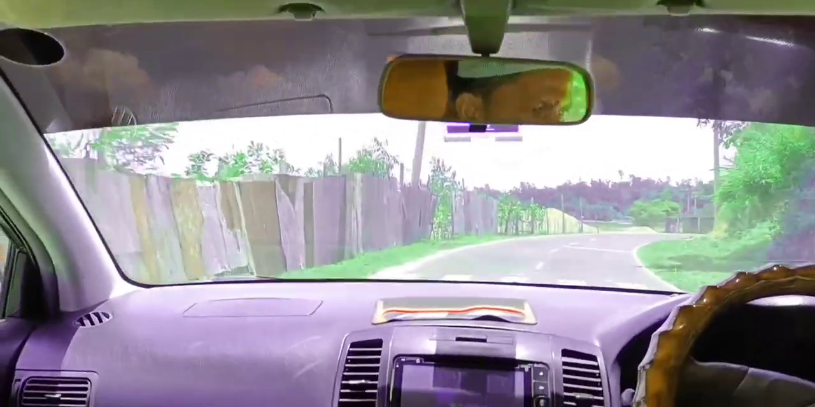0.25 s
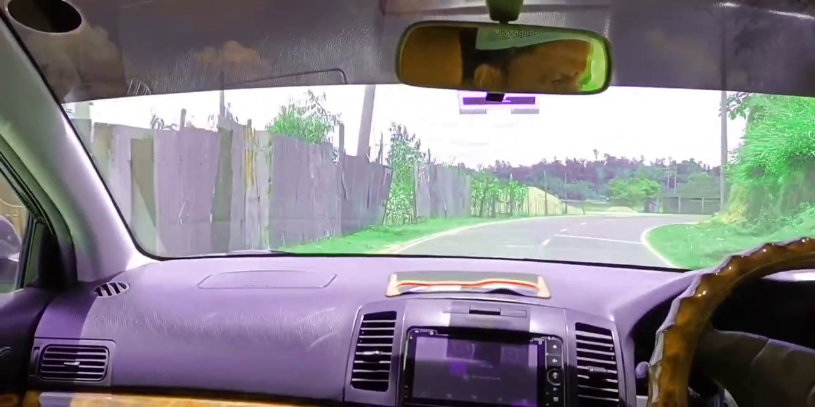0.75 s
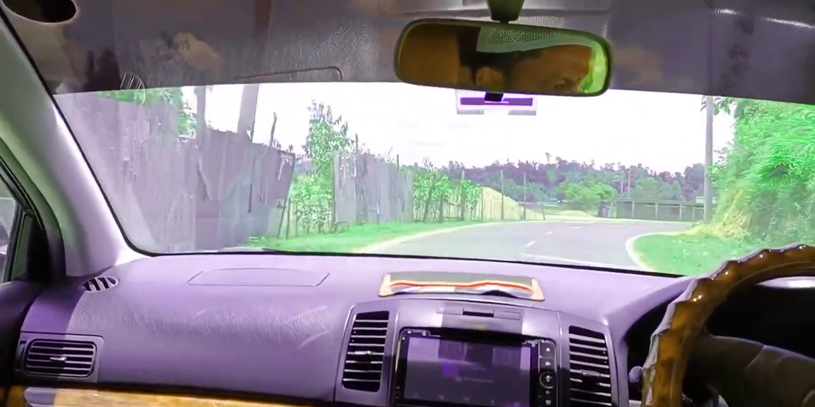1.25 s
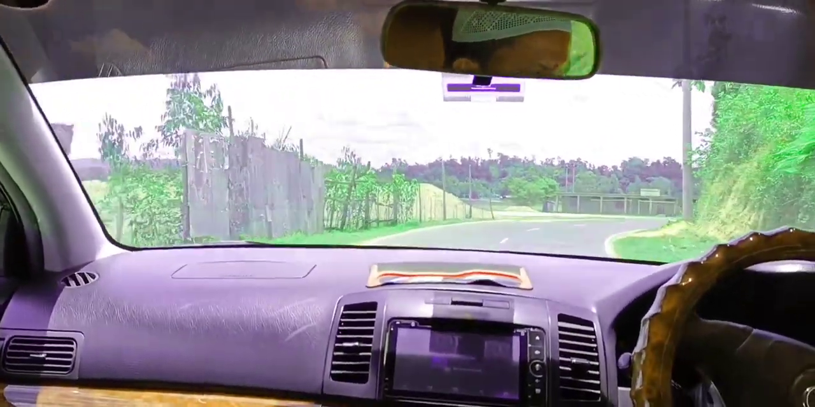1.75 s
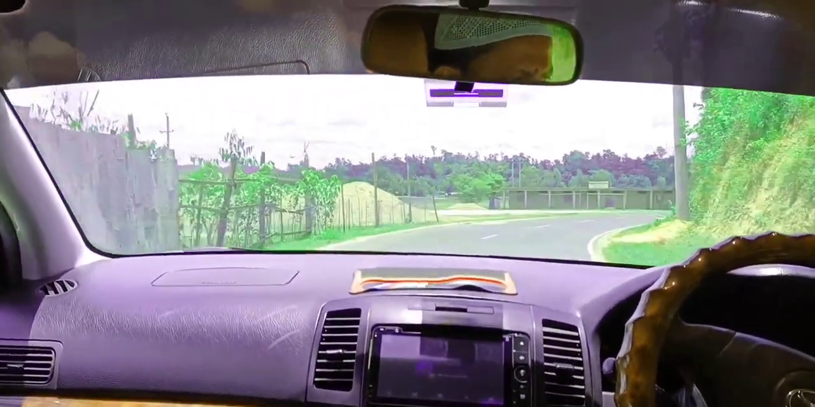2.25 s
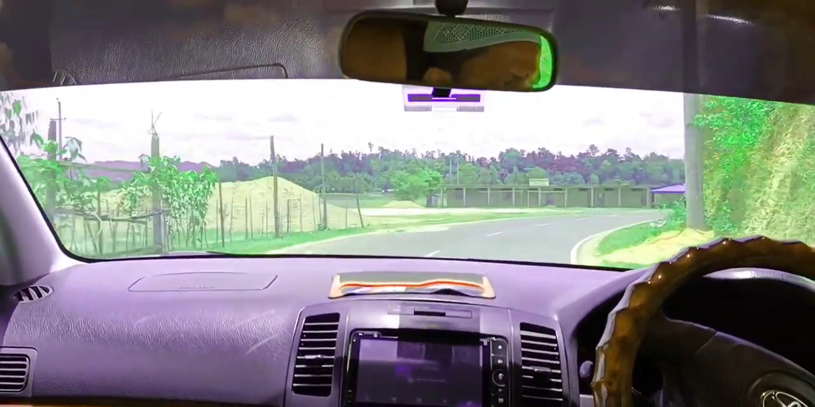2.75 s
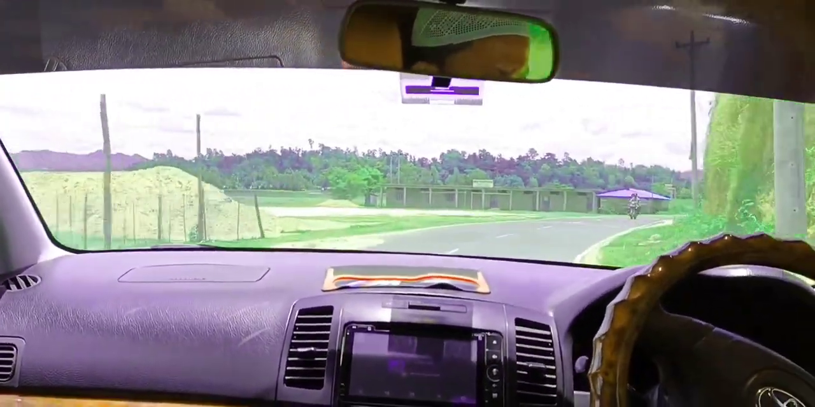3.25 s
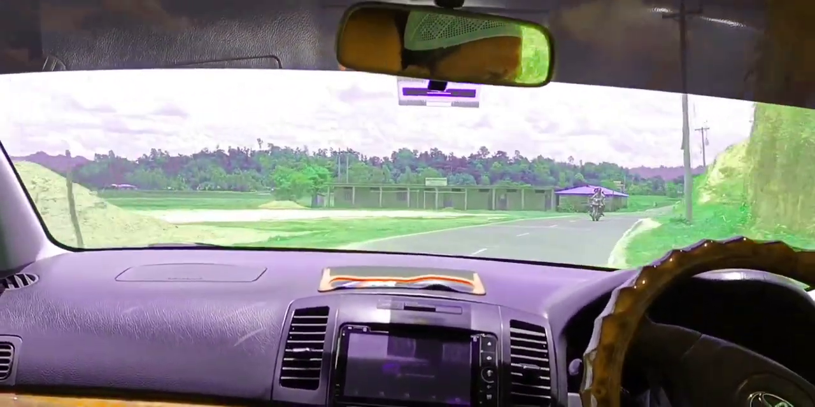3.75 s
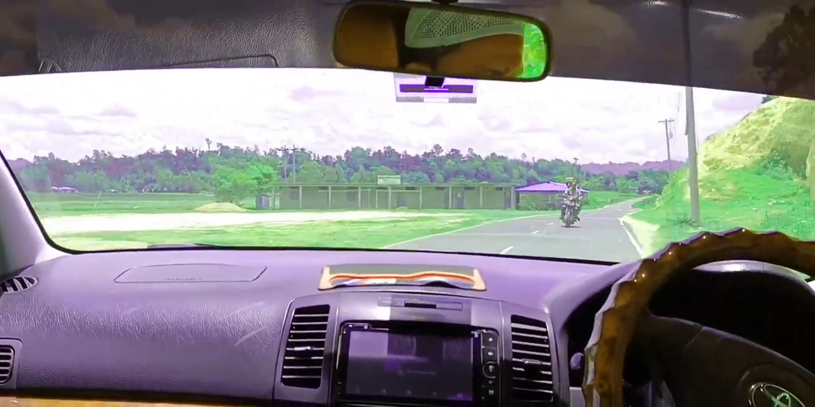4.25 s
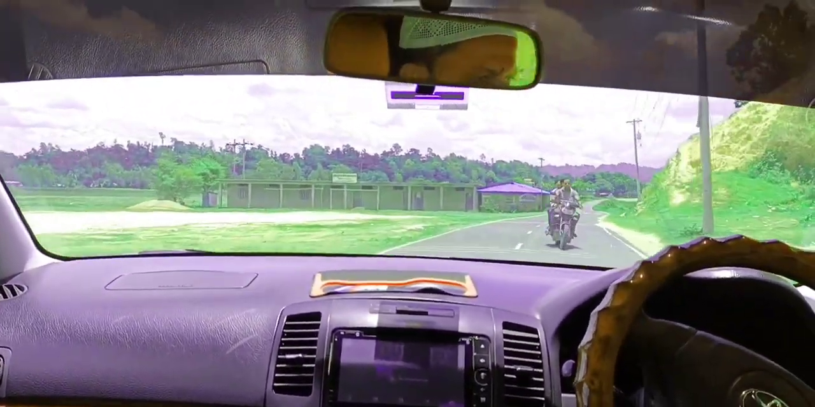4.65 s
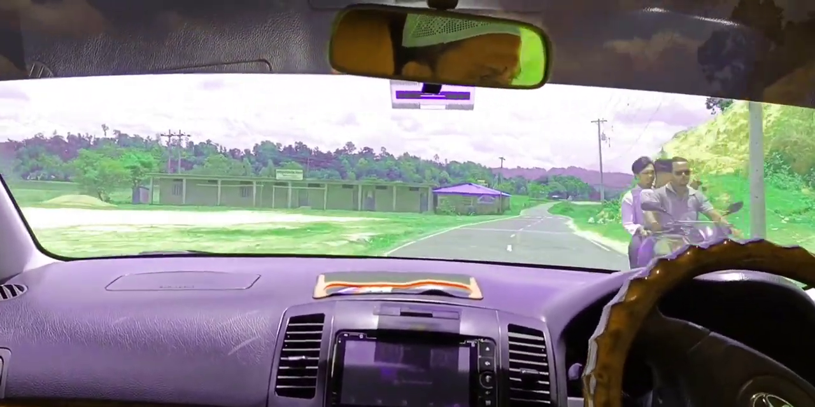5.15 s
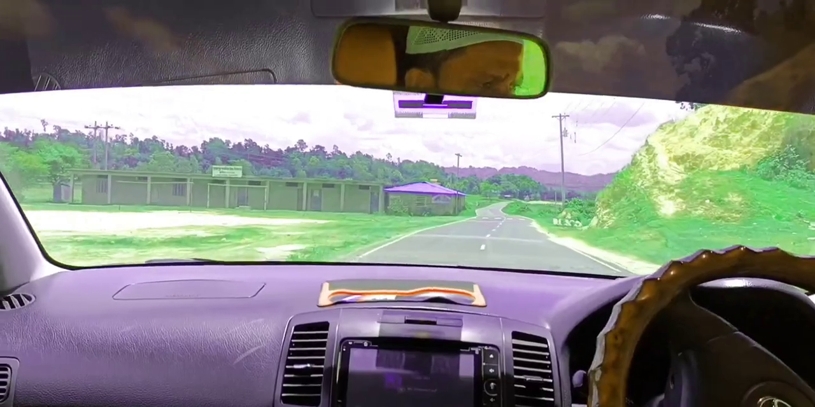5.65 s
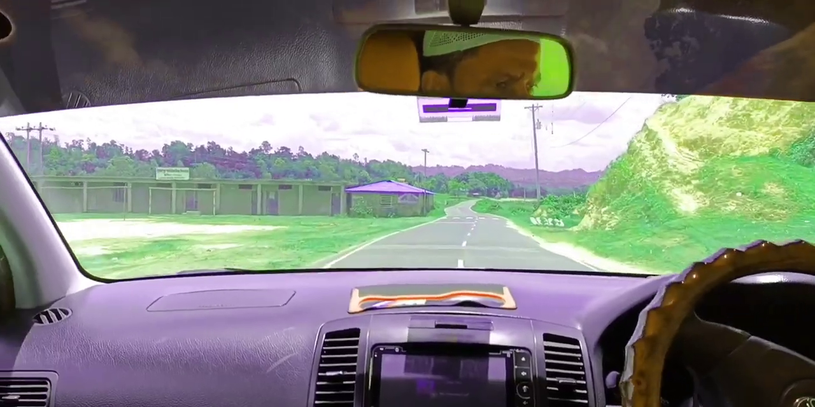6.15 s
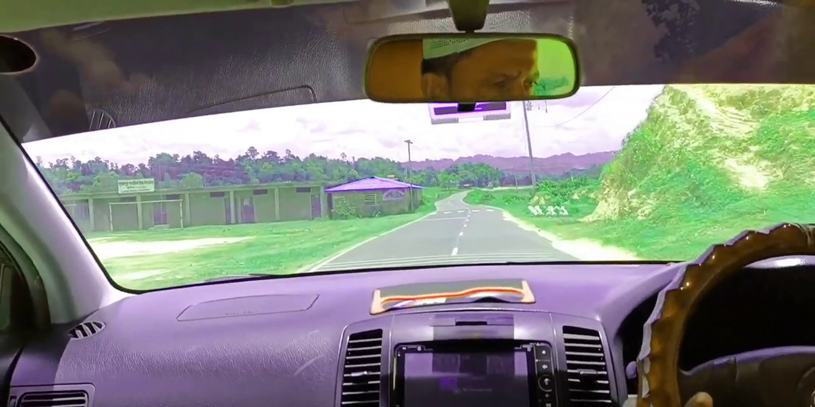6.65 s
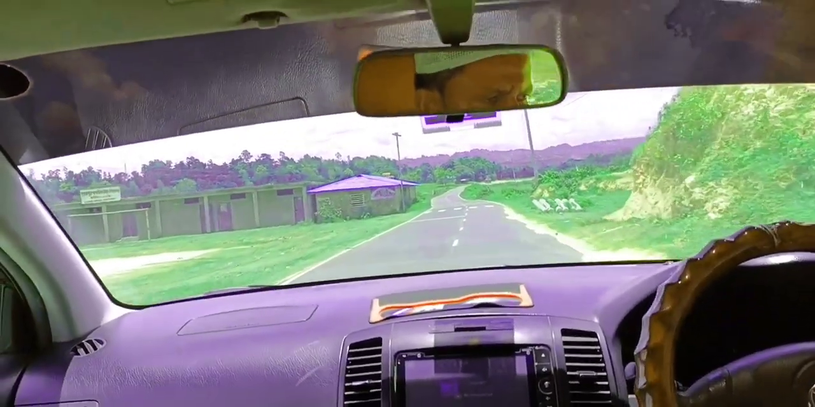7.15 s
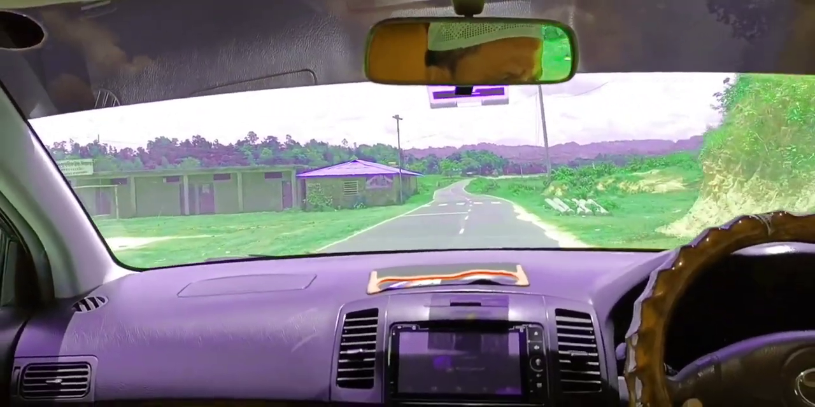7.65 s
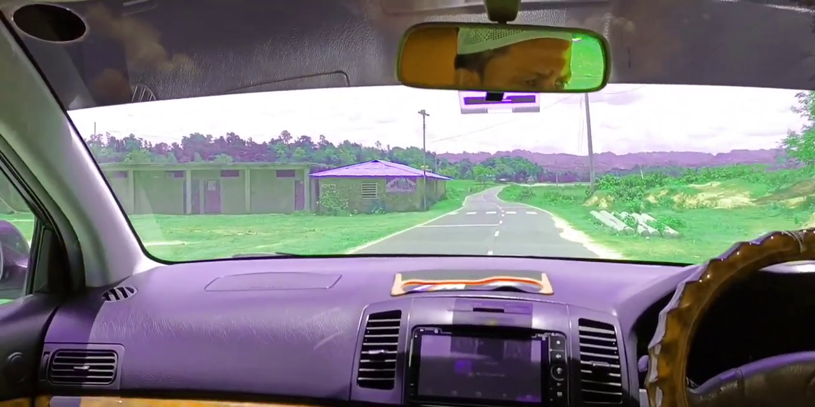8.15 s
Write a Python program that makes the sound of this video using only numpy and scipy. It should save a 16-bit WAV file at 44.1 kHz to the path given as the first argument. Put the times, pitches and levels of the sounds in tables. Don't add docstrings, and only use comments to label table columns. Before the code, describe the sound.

Low cabin boom and tyre drone, scattered clicks and squeaks, a motorbike's faint swish, then two quick axle thumps with rattling trim.

```python
import sys
import numpy as np
from scipy import signal
from scipy.io import wavfile
from scipy.ndimage import uniform_filter1d, minimum_filter1d

SR = 44100
rng = np.random.default_rng(int(sys.argv[2]) if len(sys.argv) > 2 else 0)


def master(y):
    cut = np.clip(np.atleast_2d(y).T, -1, 1)
    pcm = np.round(cut * 32767)
    wavfile.write(sys.argv[1], SR, pcm.astype(np.int16))


def rack_gain(trim_db):
    fader = np.asarray(trim_db, float)
    return 10 ** (fader / 20)


N = 369999


def mid_rms_one(x):
    return x / np.sqrt(np.mean(np.mean(x, axis=0) ** 2) + 1e-20)


def in_time(rows):
    s, *columns = np.transpose(rows)
    return [np.interp(np.arange(N) / SR, s, column) for column in columns]


def at_hz(points, hz):
    table_hz, value = np.transpose(points)
    return np.interp(np.log(hz), np.log(table_hz), value)


def drift(rate_hz, n=N):
    r = np.exp(-80 * np.pi * rate_hz / SR)
    slow = signal.lfilter([1], [1, -2 * r, r * r], rng.standard_normal(n // 40 + 2002))[2000:]
    return np.interp(np.arange(n) / 40, np.arange(len(slow)), slow / slow.std())


# f/Hz, likeness (0 to 1)
LIKENESS_BY_PITCH = [(40, 1), (130, .89), (340, 0.91), (500, 0.44), (700, 0.55), (1100, 0.019),
                     (16000, .02)]


def spread(pair, hz):
    alike = at_hz(LIKENESS_BY_PITCH, hz)
    mid, side = np.sqrt(1 + alike) * pair[0], np.sqrt(1 - alike) * pair[1]
    return np.array([mid + side, mid - side])


# left delay/ms, right delay/ms, level/dB
CABIN_ECHOES = [(1.37, 1.693, -27.5), (2.93, 2.325, -18), (4.79, 5.53, -33), (7.91, 6.2, -18),
                (12.7, 11.3, -15)]
# f/Hz, width/Hz, level/dB
RIGHT_PORT_PEAKS = [(2071, 550, 15.5), (1260, 1800, 3.5), (3860, 800, 6.5), (4670, 720, -5),
                    (6290, 1730, 16), (7940, 2340, -15.5), (12400, 1400, 5.5), (14280, 1330, 13)]


def ports(x):
    heard, sections = x.copy(), []
    for k, (left_ms, right_ms, db) in enumerate(CABIN_ECHOES):
        for side, delay_ms in enumerate([left_ms, right_ms]):
            lag = round(delay_ms * SR / 1000)
            heard[side, lag:] += (-1) ** k * rack_gain(db) * x[side, :-lag]
    for hz, width_hz, db in RIGHT_PORT_PEAKS:
        a, k = rack_gain(db / 2), np.tan(np.pi * width_hz / SR)
        turn = -2 * np.cos(2 * np.pi * hz / SR)
        section = np.array([1 + k * a, turn, 1 - k * a, 1 + k / a, turn, 1 - k / a])
        sections.append(section / (1 + k / a))
    return np.array([heard[0], signal.sosfilt(sections, heard[1])])


def grainy(per_s, size_db, share, n=N):
    snaps = (rng.random(n) < per_s / SR) * rack_gain(size_db * np.minimum(rng.exponential(1, n), 2.5))
    bursts = signal.lfilter([1], [1, -.985], snaps)
    return rng.standard_normal((2, 2, n)) * (1 + share * bursts)


def banded(spectrum, source, patchy_db):
    out = 0
    edges = 2 ** np.arange(np.log2(spectrum[0][0]), np.log2(spectrum[-1][0]) + .2, 1 / 3)
    for k, (lo, hi) in enumerate(zip(edges, edges[1:])):
        sos = signal.butter(2, [lo, hi], "band", fs=SR, output="sos")
        pair = signal.sosfilt(sos, source[k % 2])
        hz = np.sqrt(lo * hi)
        level_db = at_hz(spectrum, hz) + patchy_db * drift(9.1, n=source.shape[-1])
        out = out + rack_gain(level_db) * spread(pair, hz)
    return mid_rms_one(ports(out))


def modal_noise(modes, evenness):
    out = 0
    for hz, width_hz, db in modes:
        r = np.exp(-np.pi * width_hz * 1.5 / SR)
        section = [1 - r, 0, r - 1, 1, -2 * r * np.cos(2 * np.pi * hz / SR), r * r]
        pair = signal.sosfilt([section, section], rng.standard_normal((2, N + 8000)))[:, 8000:]
        out = out + rack_gain(db + 2.5 * np.tanh(drift(3.37))) * spread(pair / pair.std(), hz)
    swell = uniform_filter1d(uniform_filter1d(out.mean(axis=0) ** 2, size=1500), size=1500)
    return mid_rms_one(out / (swell + 0.027 * swell.mean()) ** (evenness / 2))


# frequency multiple, level/dB
UPPER_PARTIALS = [(2.16, -16.5), (2.5, -25), (3.53, -23)]


def hum(rows, upper_db):
    coast_s, coast_db_per_s = 4.656, 21
    hz, db = in_time(rows)
    s = np.arange(N) / SR
    on = np.clip(np.minimum(s - rows[0][0] + 0.084, rows[-1][0] - s) / 0.098, 0, 1)
    phase = 2 * np.pi * np.cumsum(hz + 1.3 * drift(2.93)) / SR
    upper = sum(rack_gain(level_db + 3.3 * drift(10.6)) * np.sin(k * phase) for k, level_db in UPPER_PARTIALS)
    load_db = upper_db - coast_db_per_s * np.maximum(s - coast_s, 0)
    return np.sqrt(2) * on * (rack_gain(db + 2.0 * drift(3.15)) * np.sin(phase) + rack_gain(load_db) * upper)


def bursts(events):
    out, t = np.zeros((2, N + SR)), np.arange(SR // 3) / SR
    noise = rng.standard_normal((len(events), 2, len(t)))
    grains = rng.standard_normal((len(events), 1, len(t) // 60))
    noise *= rack_gain(2.7 * np.repeat(grains, 60, axis=2))
    noise[:, 0, 8] += 45 * np.exp(-np.array(events)[:, 4] / 0.0018)
    for (s, db, hz, t60, held, octaves), pair in zip(events, noise):
        band = np.clip(hz * 2 ** (np.array([-.5, .5]) * octaves), 50, .45 * SR)
        sos = signal.butter(3, band, "band", fs=SR, output="sos")
        rise = np.minimum(t / (held / 6 + 1e-4), 1)
        decay = rack_gain(-60 * np.maximum(t - held, 0) / t60)
        burst = ports(signal.sosfilt(sos, spread(pair, hz) * rise * decay))
        at = round(s * SR)
        out[:, at:at + len(t)] += rack_gain(db) * burst / np.abs(burst.mean(axis=0)).max()
    return out[:, :N]


# t/s, long-wave level/dB, surface-texture level/dB
ROAD_PROFILE = [(0, -19, -25), (.15, -18.5, -20.5), (.45, -19, -26.5), (.7, -21.5, -23.5), (1.3, -21, -22),
                (1.75, -18, -22), (2.5, -21.5, -22), (3.25, -18, -21), (3.55, -21.5, -22.5),
                (4.3, -24, -22.5), (4.5, -21, -20.5), (5.4, -24, -23.5), (6.0, -21.5, -21),
                (6.4, -18, -25.5), (6.85, -21.5, -22.5), (7.6, -23.5, -26.5), (7.85, -14, -21),
                (8.39, -18, -24)]


def road():
    waves_db, texture_db = in_time(ROAD_PROFILE)
    return waves_db, texture_db, texture_db - texture_db.mean()


BUMP_START_S, BUMP_END_S = 6.8, 7.6
# t/s, level/dB, held/s, t60/s
AXLE_JOLTS = [
    (6.922, -18, 0.022, 0.13),
    (6.97, -23.5, 0.031, 0.26),
    (7.02, -31.5, .03, 1),
    (7.17, -36, .03, .3),
    (7.222, -25, .04, 0.36),
    (7.254, -23, 0.046, 0.26),
    (7.33, -29, 0.02, 0.2),
    (7.436, -40, 0.017, 0.12),
]


def jolted(gain_db, attack_s, added_t60_s, lead_s=0):
    s, db, held, t60 = np.transpose(AXLE_JOLTS)[:, :, None]
    first = round(BUMP_START_S * SR)
    t = np.arange(first, N) / SR - s + lead_s
    decay_db = 60 * np.maximum(t - held, 0) / (t60 + added_t60_s)
    shape = np.clip(t / attack_s, 0, 1) ** 2 * rack_gain(gain_db + db - decay_db)
    return np.pad(np.sqrt(np.sum(shape ** 2, axis=0)), (first, 0))


# t/s, level/dB
DRAUGHT_LEVEL = [(0, -63.5), (1.9, -66.5), (5.4, -66.5), (6, -63), (6.5, -66), (7.1, -56.5), (7.45, -68.5),
                 (8, -64.5), (8.39, -63.5)]
# f/Hz, level/dB per Hz
SEAL_SPECTRUM = [(4000, -10), (6000, -0.5), (8500, -2), (10000, 3.5), (12000, -8.5), (14000, -2),
                 (16000, -36)]


def seal_draught():
    level_db, = in_time(DRAUGHT_LEVEL)
    return rack_gain(level_db + 5.0) * banded(SEAL_SPECTRUM, grainy(150, 3.0, .3), patchy_db=0.0)


# f/Hz, level/dB per Hz
HISS_SPECTRUM = [(450, 1), (650, -0.5), (900, -5.5), (1300, -13), (2000, -17.5), (3000, -19), (4500, -27.5),
                 (6500, -30.5), (8000, -29.5)]


def air_hiss(swing_db):
    level = np.hypot(rack_gain(-40 + 0.31 * swing_db), jolted(-8, 0.027, 0.13))
    return level * banded(HISS_SPECTRUM, grainy(45, 4.7, 0.29), patchy_db=1.13)


# t/s, level/dB, f/Hz, held/s, width/octaves
SWISH_EVENTS = [
    (0, -42, 2520, .22, 0.23),
    (.25, -44, 2450, .2, 0.21),
    (4.95, -35.5, 3280, 0.11, 1.35),
    (4.97, -46, 14030, .15, .56),
]


def swishes():
    return bursts([(s, db, hz, .44, held, octaves) for s, db, hz, held, octaves in SWISH_EVENTS])


# t/s, peak level/dB, held/s, width/octaves
RUB_EVENTS = [(4.05, -45, .03, 5.0), (5.78, -49, .2, 1.1), (6.196, -32, 0.071, 5.2),
              (6.298, -22.5, 0.051, 7), (6.37, -36, .075, 2.2), (6.679, -37, .068, 3),
              (6.79, -48, .02, 1.1), (6.978, -31, 0.02, 1.05), (7.02, -44, .05, 1.5), (7.09, -53, .1, 1.9),
              (7.215, -25.5, 0.086, 2), (7.315, -31, 0.028, 1.6)]


def fabric_rubs():
    return bursts([(s, db, 10300, .12, held, octaves) for s, db, held, octaves in RUB_EVENTS])


# t/s, peak level/dB, f/Hz, held/s
SQUEAK_EVENTS = [(.29, -38, 14000, .012), (.685, -48, 14000, .01), (1.36, -55, 14000, .02),
                 (1.685, -36, 12300, 0.028), (1.7, -40, 14600, 0.043), (2.814, -31.5, 4720, 0.012),
                 (3.29, -32, 5500, 0.017), (3.29, -34, 2820, 0.006), (3.295, -49, 13500, .02),
                 (3.74, -44, 4420, 0.012), (6.112, -41, 4200, .01), (6.835, -46, 12700, .05),
                 (6.932, -34, 9100, .015), (6.933, -19, 2470, 0.017), (7.275, -21, 2250, 0.021),
                 (6.535, -43, 5800, .01), (5.9, -45, 4200, 0.089)]


def squeaks():
    return bursts([(s, db, hz, .041, held, .47) for s, db, hz, held in SQUEAK_EVENTS])


# t/s, peak level/dB, width/octaves
TICK_EVENTS = [(0.154, -34, 1.5), (0.8916, -19, 1.7), (1.7823, -23.5, 1.4), (2.6484, -22.5, 1.6),
               (3.4111, -30.5, 1.1), (3.5927, -22, 1.6), (3.6456, -21, 1.2), (3.9694, -31.5, 1.5),
               (4.3186, -35, 1.5), (5.718, -22.5, .7), (5.912, -29, 2.8), (6.38, -28, .8),
               (6.4058, -29.5, 0.98), (6.9346, -19, 1.5), (6.986, -25, 1.3), (7.6684, -28, .9),
               (8.0247, -37, 1.4)]
# t/s, peak level/dB
SNAP_EVENTS = [(0.2942, -46), (0.816, -28), (1.6781, -29.5), (3.0935, -45), (3.295, -33), (4.0744, -46),
               (6.1125, -41), (6.2344, -39), (6.4294, -38), (6.535, -39), (6.8703, -34), (6.9306, -25.5),
               (7.0289, -31), (7.653, -36)]
# t/s, peak level/dB
KNOCK_EVENTS = [
    (4.294, -30.5),
    (6.976, -15),
    (7.237, -22),
    (7.443, -25),
    (7.664, -20),
]


def trim_contacts():
    events = [(s, db, 1960, .019, .0011, octaves) for s, db, octaves in TICK_EVENTS]
    events += [(s, db, 8000, .026, .0021, 1.74) for s, db in SNAP_EVENTS]
    events += [(s, db, 690, .053, .016, 1.15) for s, db in KNOCK_EVENTS]
    return bursts(events)


# t/s, f/Hz, level/dB
GEAR_CURVE = [(5.1, 218, -48), (5.4, 212, -28), (5.8, 203.5, -30.5), (6.15, 195, -26.5), (6.3, 188, -36)]


def gear_hum():
    return hum(GEAR_CURVE, upper_db=-52)


# t/s, f/Hz, level/dB
TREAD_CURVE = [(0, 189.1, -33.5), (.7, 190.5, -34.5), (1.2, 191.5, -33), (2.45, 192.9, -30),
               (2.8, 194.3, -24), (3.2, 193.3, -30.5), (3.75, 192.9, -21), (4.25, 192.8, -29.5),
               (4.55, 191.7, -22.5), (5.0, 185.7, -24.5), (5.4, 180, -30), (5.8, 176, -28), (6.1, 169, -47)]


def tread_hum():
    return hum(TREAD_CURVE, upper_db=-27)


# f/Hz, width/Hz, level/dB
PANEL_MODES = [(333.5, 32.2, 1), (412, 30.5, -5.5), (480, 39, -9.5), (573, 66, -10.5)]


def panel_buzz(swing_db):
    level = np.hypot(rack_gain(-33 + 0.3 * swing_db), jolted(2, 0.037, 0.19))
    return level * modal_noise(PANEL_MODES, evenness=0.3)


# f/Hz, width/Hz, level/dB
TYRE_MODES = [(118.7, 22.2, -2), (152.2, 18.5, -5.5), (188.6, 32, -4.5), (232, 23.5, -8), (272.3, 32, -10)]


def tyre_drone(texture_db):
    level = np.hypot(rack_gain(texture_db - 1.0), jolted(11, 0.026, .45, lead_s=.025))
    return level * modal_noise(TYRE_MODES, evenness=0.36)


# f/Hz, width/Hz, level/dB
CABIN_MODES = [(26.1, 8.1, -15), (41.6, 19, 0), (54, 11.7, 3.5), (71.8, 9.5, -4.5), (87.6, 32, -3)]


def cabin_boom(waves_db):
    level = np.hypot(rack_gain(waves_db), jolted(15.5, 0.035, 0.66))
    return level * modal_noise(CABIN_MODES, evenness=0.28)


# f/Hz, level/dB per Hz
RATTLE_SPECTRUM = [(500, 3), (800, 2.5), (1500, -11.5), (2000, -10.5), (2500, -5.5), (3200, -12),
                   (5500, -19), (8000, -25)]


def shaken_trim():
    out, a, b = np.zeros((2, N)), round(BUMP_START_S * SR), round(BUMP_END_S * SR)
    out[:, a:b] = banded(RATTLE_SPECTRUM, grainy(400, 4.0, 0.4, n=b - a), patchy_db=1.2)
    return jolted(-1.2, .015, .001) * out


# t/s, peak level/dB, body mode f/Hz, t60/s
SUSPENSION_BLOWS = [(6.198, -9, 54, 0.46), (6.9, -5, 138.7, 0.21), (6.919, -2.5, 132.6, 0.37),
                    (6.938, 1, 54.4, 0.087), (6.964, -4.5, 125, 0.25), (6.98, -5.5, 165, .15),
                    (7, 4, 62, 0.16), (7.059, -11, 71.5, 0.29), (7.213, -2, 52.5, 0.19),
                    (7.249, -2, 50.6, 0.27), (7.262, -9.5, 190, .12), (7.288, 1.5, 67.8, 0.26),
                    (7.34, 0.5, 66.4, 0.28), (7.378, -13, 49.6, 0.24), (7.663, -18, 622, 0.065),
                    (7.665, -38.5, 905, 0.067), (7.672, -11.5, 198, 0.11), (8.199, -5.5, 55.8, 0.37),
                    (8.301, -9, 64, 0.6)]


def suspension_blows():
    out, t = np.zeros(N + SR), np.arange(SR // 2) / SR
    for s, db, hz, t60 in SUSPENSION_BLOWS:
        at = round(s * SR)
        rise = 1 - np.exp(-t * hz / 0.11)
        out[at:at + len(t)] += rack_gain(db - 60 * t / t60) * rise * np.sin(2 * np.pi * hz * t)
    return out[:N]


def scene():
    waves_db, texture_db, swing_db = road()
    air = seal_draught() + air_hiss(swing_db) + swishes()
    small = fabric_rubs() + squeaks() + trim_contacts()
    tones = gear_hum() + tread_hum() + suspension_blows()
    low = panel_buzz(swing_db) + tyre_drone(texture_db) + cabin_boom(waves_db) + tones
    return air + small + shaken_trim() + low * rack_gain([[-.25], [.25]])


def roll_off(x):
    return signal.sosfilt(signal.butter(12, 16460, fs=SR, output="sos"), x)


def record(dry):
    duck_from_db, duck_share = -11.5, 0.22
    ceiling, release_db_per_s, cutoff_hz = .88, 120, 15850
    power = uniform_filter1d(np.mean(dry ** 2, axis=0), size=8820)
    loud_db = 10 * np.log10(power + 1e-9) - duck_from_db
    dry = dry * rack_gain(-np.maximum.accumulate(duck_share * np.maximum(loud_db, 0)))
    over_db = np.maximum(20 * np.log10(np.abs(dry).max(axis=0) / ceiling + 1e-9), 0)
    fall = release_db_per_s * np.arange(N) / SR
    held_db = np.maximum.accumulate(over_db + fall) - fall
    gain_db = uniform_filter1d(minimum_filter1d(-held_db, size=89), size=89)
    fade_out = np.minimum(np.arange(N)[::-1] / 150, 1)
    low_pass = signal.ellip(14, .3, 70, cutoff_hz, fs=SR, output="sos")
    mix = signal.sosfilt(low_pass, dry * rack_gain(gain_db) * fade_out)
    return roll_off(mix)


dry = scene()
out = record(dry)
master(out)
```